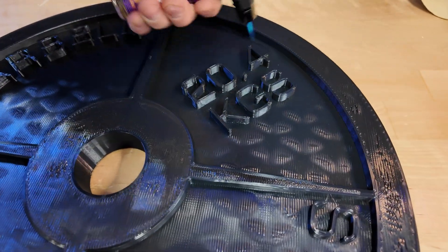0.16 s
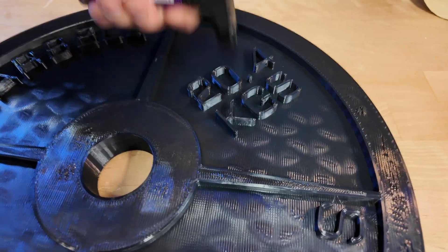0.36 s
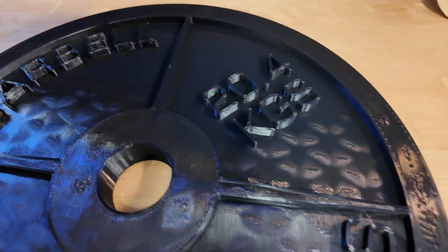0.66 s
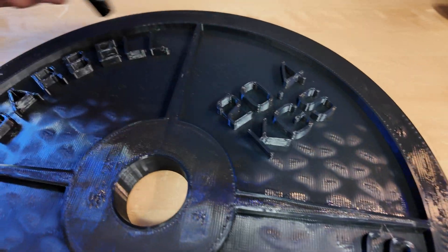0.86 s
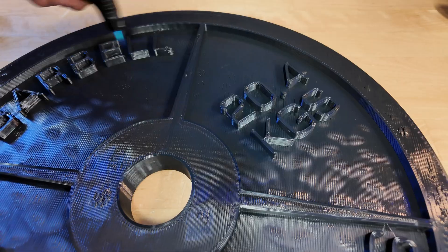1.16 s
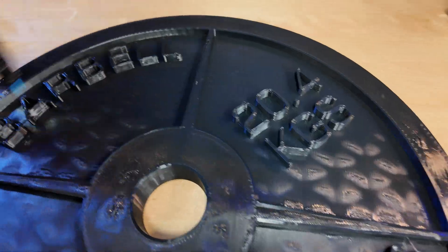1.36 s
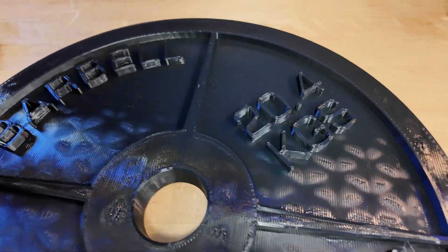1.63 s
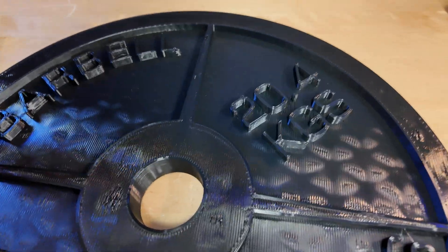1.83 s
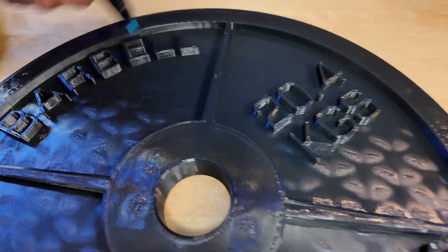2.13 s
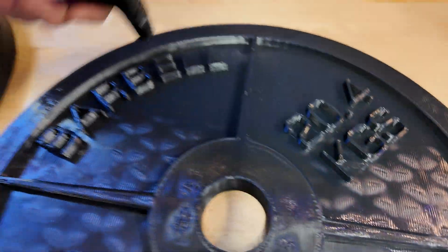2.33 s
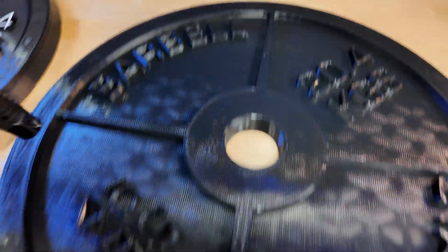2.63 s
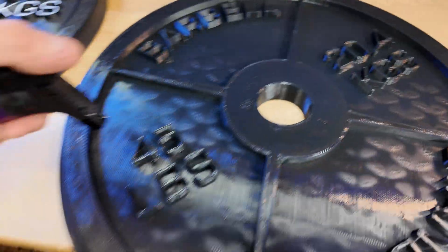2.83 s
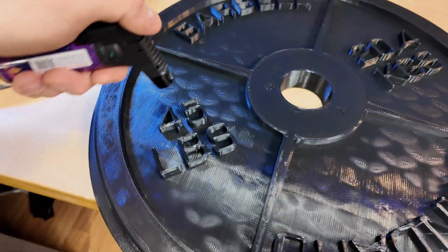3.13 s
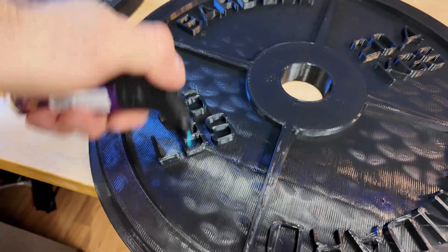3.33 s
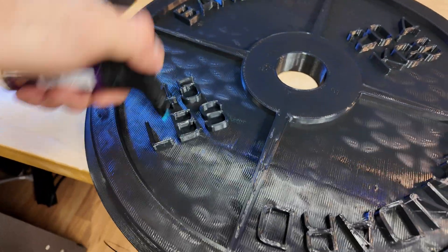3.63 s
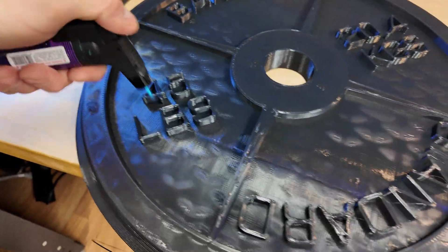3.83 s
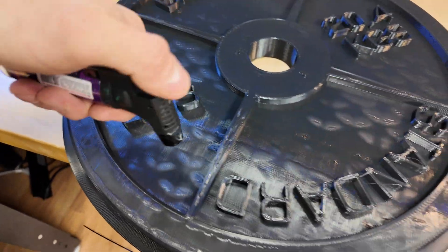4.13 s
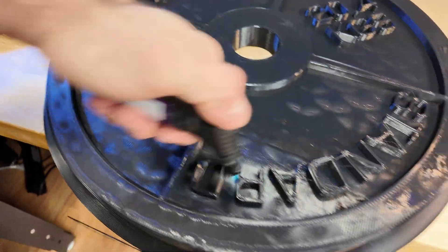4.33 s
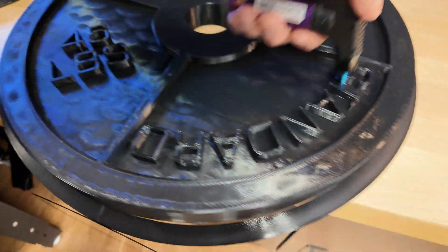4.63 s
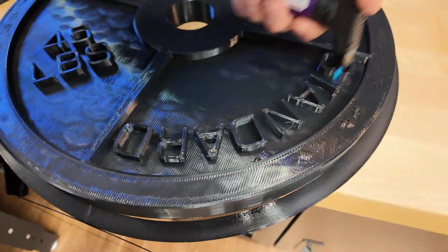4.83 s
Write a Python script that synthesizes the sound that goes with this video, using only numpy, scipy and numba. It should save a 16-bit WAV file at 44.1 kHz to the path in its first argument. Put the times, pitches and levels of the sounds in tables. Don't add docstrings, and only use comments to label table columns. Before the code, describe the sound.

A small gas torch snaps alight again and again, its sharp clicks ringing briefly, with soft flame roar and hiss between faint trigger releases.

```python
import sys
import numpy as np
from scipy import signal
from scipy.fft import rfft, irfft, next_fast_len
from scipy.io import wavfile
from scipy.ndimage import uniform_filter1d
from numba import njit

SR = 44100
rng = np.random.default_rng(int(sys.argv[2]) if len(sys.argv) > 2 else 0)


def elevation(decibels):
    levels = np.asarray(decibels, float)
    return 10 ** (levels / 20)


def file_out(sig):
    cols = np.atleast_2d(sig).T
    lim = np.clip(cols, -1, 1)
    pcm = np.round(lim * 32767).astype(np.int16)
    wavfile.write(sys.argv[1], SR, pcm)


N = 219265
LEAD = 4410


def level(x, db):
    return x * elevation(db) / np.sqrt(np.mean(x ** 2))


@njit
def svf(x, hz, width):
    y, b, l = np.empty(len(x)), 0., 0.
    g, k = np.tan(np.pi * hz / SR), width / hz
    for i in range(len(x)):
        v = (b + g * (x[i] + 1e-18 - l)) / (1 + g * (g + k))
        b, l, y[i] = 2 * v - b, l + 2 * g * v, k * v
    return y


def ring(x, modes):
    return sum((-1) ** k * elevation(db) * svf(x, 1. * hz, 1. * width)
               for k, (hz, width, db) in enumerate(modes))


def walk(rate):
    k = int(SR / rate)
    steps = rng.standard_normal(N)[np.arange(N) // k]
    return 1.3 * uniform_filter1d(uniform_filter1d(steps, k), k)


def decay(t, t60):
    return np.exp(-np.log(1000) * t / t60)


# [f/Hz, level/dB per Hz]
SHOP_AIR = [(20, -22.5), (50, -4), (130, -3.5), (200, -6), (500, -3), (1300, -9), (8000, -17.5),
            (16000, -37)]
# [f/Hz, width/Hz, level/dB]
FANS = [(128, 35, -67), (404, 22, -74.5), (455, 21, -72.5), (279.7, 21, -74.5), (1870, 94, -78)]
SHOP_DB, FAN_WAVER_DB = -58.5, 1.3


def shop():
    size = next_fast_len(N)
    hz = np.fft.rfftfreq(size, 1 / SR) + 1
    curve_hz, curve_db = np.transpose(SHOP_AIR)
    colour = np.interp(np.log(hz), np.log(curve_hz), curve_db)
    air = irfft(rfft(rng.standard_normal(size)) * elevation(colour), size)[:N]
    hum = 0
    for f, width, db in FANS:
        tone = level(svf(rng.standard_normal(N), 1. * f, 1. * width), db)
        hum = hum + tone * elevation(FAN_WAVER_DB * walk(2.8))
    return level(air, SHOP_DB - 5.5) + hum


# [f/Hz, level after a snap/dB, level after a release/dB, t60/s]
ROOM = [(500, -30.5, -15, .42), (1980, -21.5, -10.5, 0.32), (3400, -11, -7, 0.44),
        (5000, -15.5, -10.5, 0.62), (6750, 1, -6.5, 0.58), (10000, -0.5, 0, 0.32),
        (12500, -13.5, -37, 0.48), (15500, -19.5, -25.5, .2)]
ROOM_GAP_S, ROOM_BUILD_S, ROOM_PATCHY_DB = 0.0037, 0.005, .9


def room_ring(column):
    t = np.arange(SR // 2) / SR
    room = np.array(ROOM)
    bands = 400 * 2 ** np.arange(0, 5.4, .2)
    db, t60 = (np.interp(np.log(bands), np.log(room[:, 0]), room[:, c]) for c in (column, -1))
    noise = []
    for hz, band_db in zip(bands, db):
        band = level(svf(rng.standard_normal(2 * SR), hz, hz / 6), band_db)
        noise.append(band * elevation(ROOM_PATCHY_DB * walk(24.4)[:2 * SR]))
    noise = np.transpose(noise)
    fade = decay(t[:, None], t60) / np.sqrt(np.sum(elevation(db) ** 2))
    build = 1 - np.exp(-np.clip(t - ROOM_GAP_S, 0, None) / ROOM_BUILD_S)
    return lambda start: build * np.sum(noise[start:start + SR // 2] * fade, axis=1)


# [t/s, peak level/dB, f favoured by the way the shell faces/Hz, plate echo/ms, rebound/ms]
SNAPS = [
    (-.02, -11, 8330, .7, 2.5),
    (1.1434, -9, 7700, .7, 1.9),
    (1.9634, -13.5, 9600, .35, 2.4),
    (3.3296, -12.5, 8000, 1.05, 3.4),
    (4.4544, -10.5, 10000, .35, 4.2),
]
RELEASES = [
    (0.4664, -42, 8600, 0.85, 2.2),
    (1.729, -47, 10000, 0.3, 3.7),
    (2.3328, -41.5, 9800, 0.49, 2.1),
    (4.0049, -47, 8800, 0.75, 2.5),
]
# [f/Hz, width/Hz, level/dB]
SHELL_LOW = [(760, 700, -10.5), (1218, 1800, -7.5), (2340, 540, 5.5), (3370, 126, 15), (4300, 740, -5)]
SHELL_MID = [(6050, 4200, -10.5), (6930, 580, 1), (8030, 1000, -2.5), (9180, 550, 1.5), (10000, 1000, -5)]
SHELL_TOP = [(11240, 5300, 1.5), (14230, 1100, 0.5), (15800, 1200, -4)]
TRIGGER_LOW = [(1100, 840, -0.098), (2300, 480, -1.7), (3270, 350, 1), (5900, 1200, -1.9)]
# [f/Hz, width/Hz, level/dB]
SPRING = [(3480, 120, 9), (5174, 220, 7.5), (10300, 740, 0)]
# [low shell, top shell, room, rattle, rebound: level/dB]
SNAP_KIND = (-24.5, -20, -34, -30.5, -12)
RELEASE_KIND = (-40.5, -62, -57, -55, -46)
FACING_HZ, FACING_NEAR_DB, FACING_FAR_DB = 1788, -3.5, -9.5
RATTLE_T60_S, RISE_S = 0.023, 0.00048
ECHO_DB, REBOUND_LOSS_DB_PER_MS = -2, 4
SPRING_SNAP_DB, SPRING_RELEASE_DB, SPRING_PER_DB = -12.5, -5.5, 1.1
LOW_PUSH_S = 0.01
LOW_TILT = .7


def rattle(t):
    return (t > 0) * (1 - np.exp(-np.abs(t) / RISE_S)) * decay(np.abs(t), RATTLE_T60_S)


def facing(x, hz, db):
    return x + elevation(db) * svf(x, 1. * hz, 1. * FACING_HZ)


def strike(row, kind, harder, grit):
    _, db, hz, echo_ms, lag_ms = row
    *_, rattle_db, back_db = kind
    t = np.arange(LEAD) / SR
    late = t - lag_ms / 1000
    rebound_db = back_db + harder - db - REBOUND_LOSS_DB_PER_MS * lag_ms
    push = np.sinc(t * SR) - elevation(rebound_db) * np.sinc(late * SR)
    push = push + elevation(rattle_db + harder - db) * grit * (rattle(t) + rattle(late))
    push = push + elevation(ECHO_DB) * np.sinc((t - echo_ms / 1000) * SR)
    return facing(push, hz, FACING_NEAR_DB)


def clicks():
    near, far = np.zeros(N + SR), np.zeros(N + SR)
    t = np.arange(LEAD) / SR
    loud, soft = room_ring(column=1), room_ring(column=2)
    for rows, kind, low, ring_from in ((SNAPS, SNAP_KIND, SHELL_LOW, loud),
                                       (RELEASES, RELEASE_KIND, TRIGGER_LOW, soft)):
        low_db, top_db, room_db, *_ = kind
        mean_db = np.mean(rows, axis=0)[1]
        shell = low, SHELL_MID, SHELL_TOP
        peaks = [np.abs(ring(np.sinc(t * SR), modes)).max() for modes in shell]
        for k, row in enumerate(rows):
            s, db, hz, *_ = row
            harder = 0 if rows is SNAPS else db - mean_db
            push = strike(row, kind, harder, rng.standard_normal(LEAD))
            pushes = push * np.exp(-t / LOW_PUSH_S), push, push
            part_dbs = low_db - LOW_TILT * (db - harder - mean_db), db, top_db + harder
            at = LEAD + int(s * SR)
            for x, modes, part_db, peak in zip(pushes, shell, part_dbs, peaks):
                near[at:at + LEAD] += elevation(part_db) * ring(x, modes) / peak
            echoes = ring_from(k * SR // 5)
            spring_db = SPRING_SNAP_DB if rows is SNAPS else SPRING_RELEASE_DB + SPRING_PER_DB * harder
            spring = sum(ring(echoes, [mode]) for mode in SPRING)
            tail = facing(echoes, hz, FACING_FAR_DB) + elevation(spring_db) * spring
            far[at:at + SR // 2] += elevation(room_db + harder) * tail
    return near[LEAD:LEAD + N], far[LEAD:LEAD + N]


# [gas opens ahead of the snap t/s, then level/dB of cold hiss, burning hiss, roar, bright roar]
BURNS = [
    (.08, -74, -74, -59, -70),
    (0.096, -66, -70.5, -62, -60.5),
    (.048, -73, -71, -59.5, -61),
    (0.0674, -67, -73.5, -61, -60.5),
    (.124, -74.5, -74.5, -60.5, -59),
]
SHUT_LEAD_S = 0.0099


def burns():
    shuts = [row[0] - SHUT_LEAD_S for row in RELEASES] + [N / SR + 1]
    return [(snap[0] - burn[0], snap[0], out) for snap, burn, out in zip(SNAPS, BURNS, shuts)]


# [f/Hz, width/Hz, level/dB]
ROAR = [(298, 470, -6.5), (580, 290, 1), (930, 906, -6)]
BRIGHT = [(1474, 900, 0.5), (2500, 3300, -0.5), (4250, 4000, -4)]
# [peak t/s, length/s, swell level/dB]
LICKS = [
    (0.26, 0.23, 5.5),
    (1.492, 0.51, 6),
    (2.168, 0.17, 6.5),
    (3.578, 0.13, 9.5),
    (3.739, 0.087, 9),
    (3.819, .07, 7.5),
    (3.92, 0.24, 1),
    (4.93, 0.044, -3),
]
# [from, to t/s]
POCKET = (1880, 66, -61.5)
POCKET_FADE_S = .32, .42
CATCH_S, STARVE_S, BRIGHT_SAG_DB_PER_S = .045, 0.012, 9.5
LICK_BRIGHT_SHARE = 1.14


def flame():
    t, low, high = np.arange(N) / SR, 0, 0
    for (_, lights, shuts), (*_, roar_db, bright_db) in zip(burns(), BURNS):
        lit = np.interp(t, [lights, lights + CATCH_S, shuts - STARVE_S, shuts], [0, 1, 1, 0])
        low = low + lit * elevation(roar_db)
        high = high + lit * elevation(bright_db - BRIGHT_SAG_DB_PER_S * (t - lights))
    lick_db = sum(db * np.clip(1 - np.abs(2 * (t - s) / length), 0, 1) for s, length, db in LICKS)
    roar = level(ring(rng.standard_normal(N), ROAR), 0)
    roar = roar * low * elevation(lick_db + 1.2 * walk(40))
    grain = elevation(0.29 * rng.exponential(size=N)) * rng.standard_normal(N)
    bright = level(ring(ring(grain, BRIGHT), BRIGHT), 0)
    bright = bright * high * elevation(LICK_BRIGHT_SHARE * lick_db + 0.97 * walk(45))
    hz, width, db = POCKET
    pocket = level(svf(rng.standard_normal(N), 1. * hz, 1. * width), db)
    return roar + bright + pocket * np.interp(t, POCKET_FADE_S, [1, 0])


# [f/Hz, width/Hz, level/dB]
COLD = [(7400, 4100, -2.5), (11000, 4400, -4.5), (15500, 2100, -4)]
BURNING = [(6440, 5000, -9), (13100, 4500, -1), (15000, 4200, -6)]
JET_FLICKER_DB = 1.5


def hiss(modes):
    eddies = sum(elevation(JET_FLICKER_DB * walk(27)) * ring(rng.standard_normal(N), [mode]) for mode in modes)
    return level(ring(eddies, modes), 0)


def jet():
    t, cold, burning = np.arange(N) / SR, 0, 0
    for (opens, lights, shuts), (_, cold_db, burning_db, *_) in zip(burns(), BURNS):
        unlit = np.interp(t, [opens, opens + 0.019, lights, lights + 0.0077], [0, 1, 1, 0])
        lit = np.interp(t, [lights, lights + .01, shuts - .01, shuts], [0, 1, 1, 0])
        cold = cold + elevation(cold_db) * unlit
        burning = burning + elevation(burning_db) * lit
    return cold * hiss(COLD) + burning * hiss(BURNING) * elevation(0.87 * walk(4.1))


# [starts t/s, fastest t/s, stops t/s, level/dB,
# fine band rel level/dB]
RUB = [
    (.4, 1.038, 1.1, -66.5, -21),
    (2.574, 2.783, 3.12, -66, -25.5),
    (2.82, 3.054, 3.26, -65, -5),
    (3.688, 3.732, 3.8, -74, 7),
    (4.1, 4.36, 5.4, -73, -10),
]


def rub():
    t = np.arange(N) / SR
    fine = level(svf(svf(rng.standard_normal(N), 8400., 5900.), 8400., 5900.), 0)
    coarse = level(svf(svf(rng.standard_normal(N), 2500., 5000.), 2500., 5000.), 0)
    out = 0
    for starts, fastest, stops, db, fine_db in RUB:
        speed = np.interp(t, [starts, fastest, stops], [0, 1, 0])
        out = out + speed * elevation(db) * (coarse + speed * elevation(fine_db) * fine)
    return elevation(1.2 * walk(29.98)) * out


# [t/s, peak level/dB, f/Hz, width/Hz]
GRIP = [(.647, -53, 9000, 4970), (1.022, -59, 11000, 7100), (1.037, -59, 10000, 7000),
        (1.866, -63, 13500, 4000), (2.506, -60, 10500, 2500), (2.516, -48, 7800, 9000),
        (2.535, -63.5, 11500, 3000), (3.1402, -39.5, 6800, 7000), (3.23, -62, 10000, 3000),
        (4.207, -62.5, 10500, 8000), (4.215, -60.5, 8000, 1500), (4.247, -55, 7000, 6060),
        (4.277, -61, 9000, 7000), (4.3, -64, 11000, 5000), (4.879, -47, 1760, 400)]
GRIP_S = 0.00099


def grip():
    out, t = np.zeros(N + SR), np.arange(LEAD) / SR
    for s, db, hz, width in GRIP:
        band = [(hz, width, 0)]
        grit = rng.standard_normal(LEAD) * np.exp(-t / GRIP_S)
        tick = ring(ring(grit, band), band)
        at = int(s * SR)
        out[at:at + LEAD] += elevation(db) * tick / np.abs(tick).max()
    return out[:N]


# [t/s, peak level/dB, f/Hz, t60/s, upper mode rel level/dB]
PUFFS = [
    (1.145, -38.5, 122, 0.039, -15),
    (1.964, -44, 118, 0.044, -1),
    (2.657, -52, 189, 0.064, -4),
    (2.69, -44.5, 140, 0.079, -12.5),
    (2.717, -52.5, 146, 0.42, -8),
    (3.332, -47.5, 107, 0.066, 2),
    (4.455, -45, 120, 0.043, -0.5),
]
# [f/Hz, width/Hz, level/dB]
UPPER = [(280, 440, 1), (520, 260, -5), (790, 407, -12.5)]


def puffs():
    out, t = np.zeros(N + SR), np.arange(SR // 2) / SR
    for s, db, hz, t60, upper_db in PUFFS:
        shape = (1 - np.exp(-t / .003)) * decay(t, max(t60, .01))
        rough = level(ring(rng.standard_normal(len(t)), UPPER), upper_db)
        swing = np.sin(2 * np.pi * hz * t) + rough
        at = int(s * SR)
        out[at:at + len(t)] += elevation(db) * swing * shape / shape.max()
    return out[:N]


TOP_HZ = 15700


def low_pass(x, hz):
    return signal.sosfilt(signal.ellip(10, .2, 70, hz, fs=SR, output="sos"), x)


def scene():
    near, far = clicks()
    steady = far + shop() + flame() + jet() + rub() + grip() + puffs()
    return (low_pass(near, TOP_HZ + 600) + low_pass(steady, TOP_HZ))[None]


def roll_off(x):
    return signal.sosfilt(signal.butter(12, 16890, fs=SR, output="sos"), x)


def record(dry):
    return roll_off(dry)


dry = scene()
out = record(dry)
file_out(out)
```